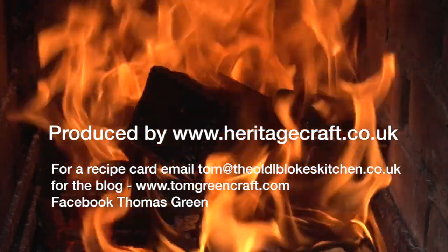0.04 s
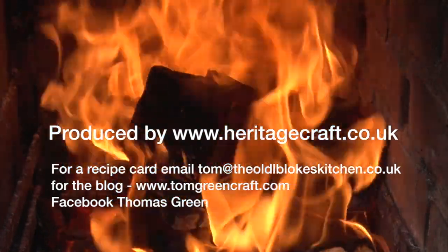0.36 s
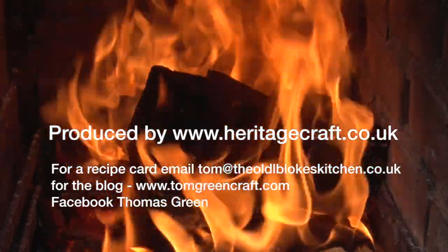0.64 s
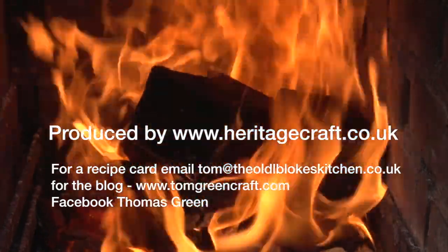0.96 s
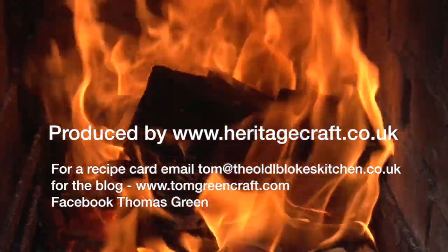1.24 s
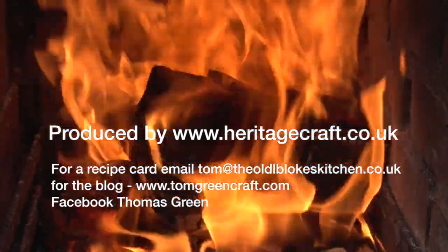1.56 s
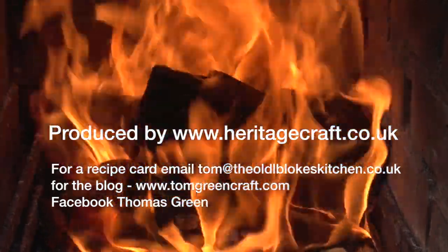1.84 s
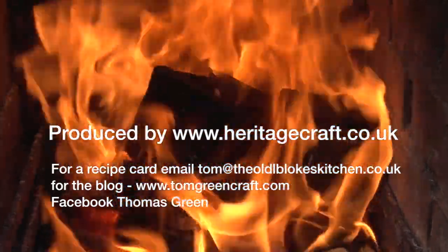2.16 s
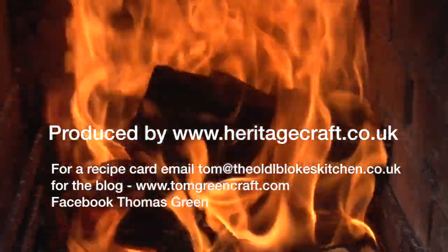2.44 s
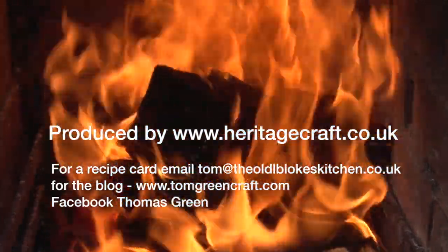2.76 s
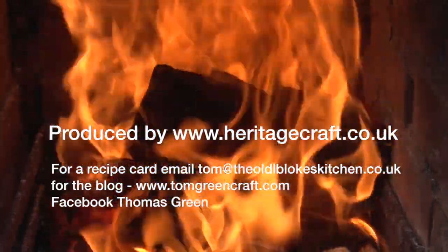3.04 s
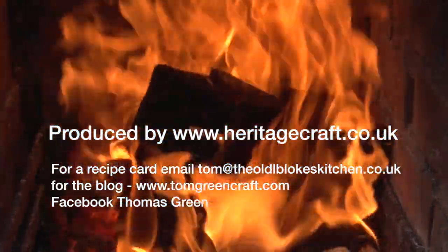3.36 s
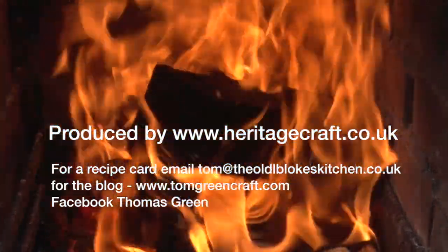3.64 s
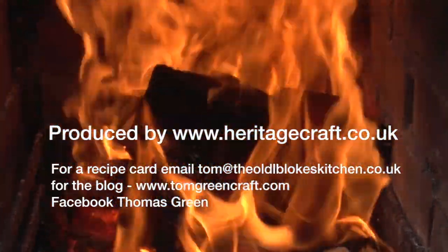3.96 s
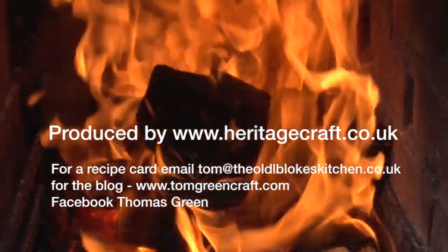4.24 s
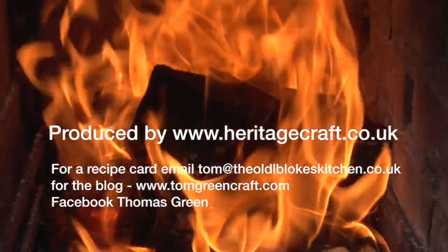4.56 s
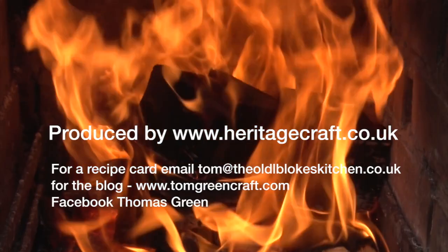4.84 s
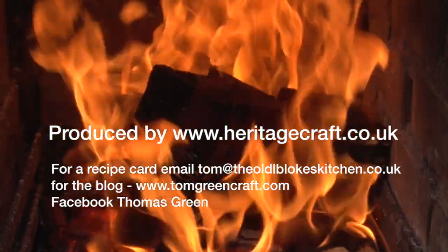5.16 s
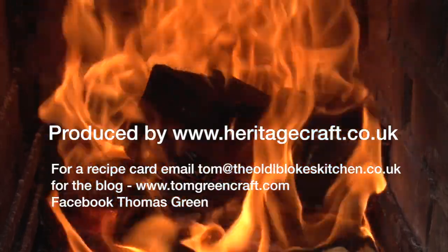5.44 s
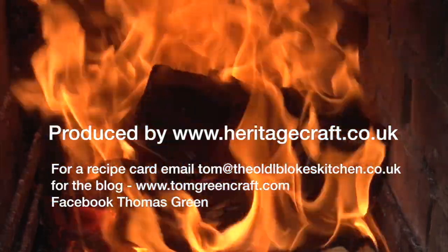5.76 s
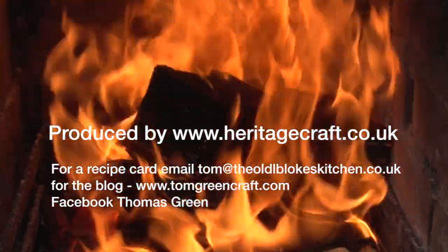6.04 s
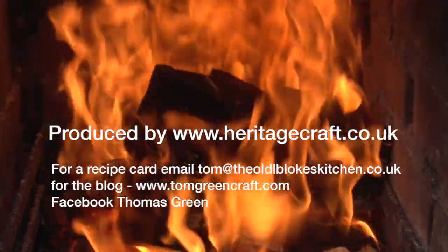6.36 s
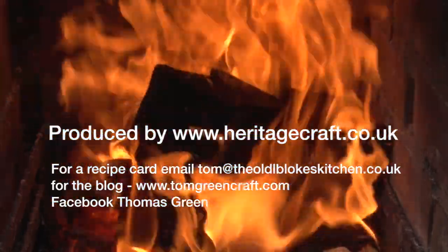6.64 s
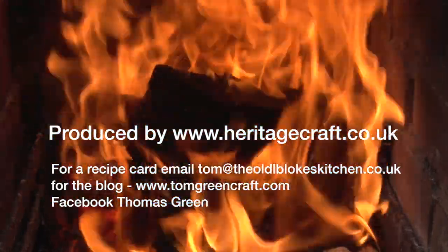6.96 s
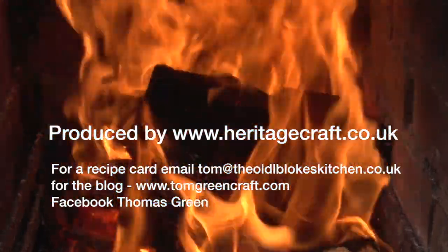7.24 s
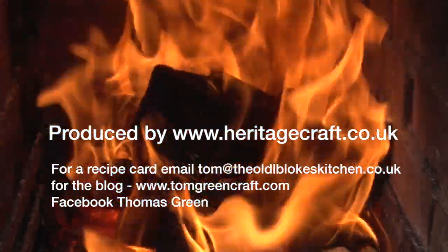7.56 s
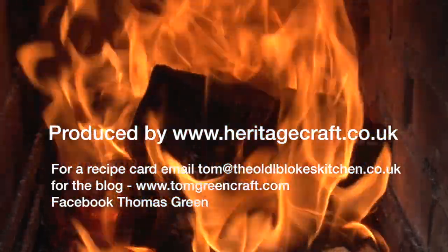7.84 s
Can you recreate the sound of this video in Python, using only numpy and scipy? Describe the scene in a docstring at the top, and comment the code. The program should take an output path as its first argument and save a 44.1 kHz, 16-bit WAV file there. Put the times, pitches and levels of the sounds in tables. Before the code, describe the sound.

A close wood fire puffs and rumbles softly throughout, heard on the left side. Small dry snaps and ticks are scattered over a fine sizzle, with an occasional faint, brief whistle of gas from the logs. After a few sharper pops early on, two very loud cracks stand out, one around halfway and one just before the end, echoing briefly in the firebox and slightly overloading the microphone.

```python
"""A low, fluttering rumble of flames, dotted with ticks and sharp pops: logs burn in an open firebox.
The flames puff and flap, sap sizzles out of the wood, and pockets of steam burst and echo in the box.
Now and then gas escapes through a crack with a faint, short whistle.
The fire is close to a microphone that feeds only the left channel; the two hardest pops overload it."""
import sys
import numpy as np
from scipy import signal
from scipy.fft import rfft, irfft, next_fast_len
from scipy.io import wavfile
from scipy.ndimage import uniform_filter1d

SR = 44100
rng = np.random.default_rng(int(sys.argv[2]) if len(sys.argv) > 2 else 0)


def pcm_store(signal):
    """Save signal as 16-bit PCM."""
    levels = np.round(np.clip(np.atleast_2d(signal), -1, 1) * 32767)
    wavfile.write(sys.argv[1], SR, levels.astype(np.int16).T)


N = 357513
TIME = np.arange(N) / SR
CUTOFF_HZ = 15750  # the highest treble let through

# Steam pockets bursting in the wood; levels are relative, and a higher tilt makes a brighter snap:
# start_s, ring_hz, ring_db, snap_db, tilt_db_per_octave, and if it rings twice: second_hz, second_db
POPS = [(.063, 4010, -55, -55, -2), (0.0883, 7800, -47, -51, 5), (0.1156, 4000, -44.5, -58, 2),
        (0.149, 13900, -51, -56, 4), (.1612, 11900, -35.5, -44, 3.5, 5380, -46),
        (.2366, 11070, -52, -61, 6), (.2461, 11670, -54, -66, 9), (0.2835, 3600, -46, -54, -3),
        (.3219, 2020, -53, -54, -3), (0.3385, 3850, -50, -43.5, 2, 5900, -48), (0.3814, 4900, -49, -51, 4),
        (0.3934, 13820, -41, -56.5, 9, 11800, -47), (.6581, 7400, -49, -60, 6),
        (0.7504, 4970, -41, -47, -2, 2450, -43), (.7817, 6030, -55, -55, 1), (.7926, 13610, -54, -63, 7),
        (0.9945, 5600, -18.5, -26.5, 4.5), (1.1, 3970, -46, -48, -3, 1420, -48),
        (1.2921, 11500, -41, -55, 7), (1.3899, 5170, -54, -59, 5), (1.522, 5450, -42, -54, 5.5),
        (1.7274, 10080, -57, -61, 5), (1.751, 5060, -46, -61, 7), (1.9943, 3700, -54, -55, 0),
        (2.1906, 2340, -31, -39.5, -3, 3530, -39), (2.2117, 5430, -53, -53, 4),
        (2.2246, 5600, -27, -35.5, -2, 3790, -33), (2.2854, 5770, -57, -55, 0),
        (2.3515, 5530, -42, -44.5, 2), (2.563, 3770, -49, -46, -0.5, 5680, -48),
        (2.6754, 7320, -53, -59, 6), (2.8877, 5800, -47, -62, 1), (2.9526, 7130, -31.5, -44, -2.5),
        (3.2254, 5170, -44, -40.5, -1), (3.306, 3620, -46, -57, 2.5), (3.3729, 11280, -52, -60, 7),
        (3.4329, 5500, -48, -51, 1), (3.4437, 11370, -50, -62, 10), (3.5425, 12000, -43, -60, 8),
        (3.5551, 5680, -54, -53, 1), (3.6061, 3270, -55, -55, -1), (3.8919, 11540, -56, -61, 5),
        (4.0003, 5430, -39, -40.5, 3, 6240, -42), (4.0713, 5600, -50, -56, -3), (4.1609, 9950, -53, -58, 4),
        (4.187, 3450, -38.5, -42, 5.5, 4390, -40), (4.3584, 4000, -42.5, -48.5, -1, 2200, -49),
        (4.469, 7460, -49, -51.5, 0), (4.6145, 5310, -4.5, -15.5, -1), (4.7185, 12500, -54, -64, 7),
        (4.8924, 5810, -52, -54, -4), (4.9045, 3790, -48, -54, -0.5), (4.9718, 4220, -43, -45, -2),
        (4.9996, 6160, -54, -54, -1), (5.1419, 13800, -50, -56, 3), (5.2075, 7410, -51, -57, 4),
        (5.2333, 1930, -33.5, -42.5, -4.5, 1335, -41), (5.2712, 7490, -57, -58, 3),
        (5.493, 3270, -52, -54, 0), (5.5117, 5570, -50, -55, -2), (5.5847, 12900, -46, -58, 7),
        (5.7442, 12900, -40, -66, 11), (5.857, 7440, -42, -47.5, -2, 1720, -48),
        (6.1674, 5770, -51, -60, 1), (6.2321, 7140, -32, -44, -2, 3875, -43),
        (6.5059, 5300, -46, -40.5, -1), (6.5868, 3670, -46.5, -57, 3.5), (6.6529, 11240, -53, -60, 7),
        (6.6917, 5600, -55, -56, 3), (6.7126, 5400, -47, -48.5, 2.5), (6.7243, 13650, -54, -57, 6),
        (6.8225, 12100, -44, -56, 7), (6.8352, 5640, -52, -53, 1), (6.8862, 3230, -56, -55, 0),
        (7.1716, 11540, -57, -59, 3), (7.2805, 5300, -39, -40, 3.5, 6675, -43),
        (7.4409, 10080, -54, -59, 4), (7.467, 3450, -40, -39.5, 4, 4435, -41),
        (7.6383, 3930, -41, -50.5, -1, 3445, -47), (7.7487, 7550, -49, -52, 1.5),
        (7.8945, 5290, -5, -14.5, -1)]
# Narrow gaps in the wood that tick: pitch_hz, relative_db
CREVICES = [(2700, -3.5), (3600, 2.5), (4500, -9), (5400, 4.5), (6300, -1), (7400, 0.5), (8600, -8),
            (9900, -7), (11600, 3), (12900, -4), (14400, -1.5)]


def from_db(db):
    """Turn decibels into a number to multiply a sound by."""
    return 10 ** (np.asarray(db) / 20)


def rms_one(x):
    """Scale a signal so that its average strength (rms) is 1."""
    return x / np.sqrt(np.mean(x ** 2) + 1e-20)


def at_level(burst, db):
    """Give a burst as much energy as a steady sound at this level lasting 2 ms."""
    return from_db(db) * burst * np.sqrt(.002 * SR / np.sum(burst ** 2))


def fade(t, fade_s):
    """A dying-away curve that falls by 60 dB in fade_s seconds."""
    return from_db(-60 * t / fade_s)


def drift(rate_hz):
    """A smooth random wander, about 1 in size; a higher rate wanders faster."""
    step, warm_up = 40, 2000
    memory = np.exp(-2 * np.pi * rate_hz * step / SR)
    noise = rng.standard_normal(N // step + warm_up + 2)
    slow = signal.lfilter([1], [1, -2 * memory, memory ** 2], noise)[warm_up:]
    return np.interp(np.arange(N) / step, np.arange(len(slow)), rms_one(slow))


def band(x, low_hz, high_hz):
    """Keep the part of a sound between two frequencies."""
    band_pass = signal.butter(2, [low_hz, min(high_hz, .45 * SR)], "band", fs=SR, output="sos")
    return signal.sosfilt(band_pass, x + 1e-18)


def coloured(x, spectrum):
    """Shape a sound's tone with rows of (frequency_hz, relative_db); the result has strength 1."""
    size = 2 * next_fast_len(N // 2 + SR // 4)
    hz, db = np.transpose(spectrum)
    grid_hz = np.arange(size // 2 + 1) * SR / size
    gain = from_db(np.interp(np.log(grid_hz + 1), np.log(hz), db))
    # Build a minimum-phase filter: it never rings before the sound arrives.
    cepstrum = irfft(np.log(gain))
    cepstrum[1:size // 2] *= 2
    cepstrum[size // 2 + 1:] = 0
    return rms_one(irfft(rfft(x, size) * np.exp(rfft(cepstrum)))[:N])


def peaks_and_dips(x, rows):
    """Boost or weaken one frequency range for each row of (centre_hz, width_hz, boost_db)."""
    for hz, width_hz, db in rows:
        gain = from_db(db / 2)
        width = np.tan(np.pi * width_hz / SR)
        centre = -2 * np.cos(2 * np.pi * hz / SR)
        forward = [1 + width * gain, centre, 1 - width * gain]
        feedback = [1 + width / gain, centre, 1 - width / gain]
        x = signal.lfilter(forward, feedback, x + 1e-18)
    return x


def echoes(x, fade_s, low_hz, high_hz):
    """Closely packed echoes that start after a millisecond and die away."""
    t = np.arange(SR // 2) / SR
    tail = band(rng.standard_normal(len(t)) * fade(t, fade_s) * (t > .001), low_hz, high_hz)
    return signal.fftconvolve(x, tail / np.sqrt(np.sum(tail ** 2)))[:N]


def puffing(rate_hz=4.96, looseness=0.31):
    """Flames swell and tear off in a loose rhythm: a curve about 1 in size."""
    size = 2 * next_fast_len(N // 2 + 1)
    hz = np.arange(size // 2 + 1) * SR / size
    near_rate = np.exp(-((hz / rate_hz - 1) / looseness) ** 2)
    return rms_one(irfft(rfft(rng.standard_normal(N), size) * near_rate)[:N])


def flames(rumble_db=-44.1, rush_db=-55.1, draught_db=-68):
    """Swirling, burning gas makes a deep puffing rumble and a fluttering rush over an even draught."""
    # How strongly the fire burns: time_s, relative_db
    blaze = [(0, 1.5), (.75, 0.5), (1.2, -1), (1.6, -1), (1.9, 1.5), (2.25, -3), (2.68, 3.5), (3.1, 0),
             (3.7, 0.5), (4.15, 2), (4.8, -2.5), (5.4, -2.5), (5.72, -1), (6.2, 0.5), (6.65, 0.5),
             (7.1, 0.5), (7.4, 2), (8.1, -3)]
    # Tongues of flame tearing loose with a soft flap: middle_s, length_s, swell_db
    flaps = [(.68, 0.088, 2), (2.34, 0.14, 4.5), (2.764, 0.063, 2), (2.98, .08, 3), (3.24, .06, 4),
             (3.565, 0.08, 6.5), (3.73, .1, 2.5), (6.028, 0.093, 6), (6.275, .06, 5), (6.52, .06, 2),
             (6.848, 0.1, 5.5)]
    # Tone of the flames rumbling in the box: frequency_hz, relative_db
    rumble_tone = [(10, -40.5), (21, -8), (40, -4), (50, 1), (59, 2), (69, -3), (92, 0), (112, -14),
                   (143, -2), (175, -7), (220, -15), (300, -25.5), (500, -41), (1200, -70)]
    # Tone of the rushing tongues of flame: frequency_hz, relative_db
    rush_tone = [(100, -11.5), (270, 4), (380, -3), (455, -1), (570, -5), (680, -0.5), (950, -4.5),
                 (1400, -11.5), (2100, -17), (3500, -27), (8000, -43)]
    blaze_db = np.interp(TIME, *np.transpose(blaze))
    puff_db = 1.2 * puffing()
    flap_db = sum(db * np.exp(-(2 * (TIME - middle_s) / length_s) ** 2) for middle_s, length_s, db in flaps)
    rumble = coloured(rng.standard_normal(N), rumble_tone)
    rumble /= np.sqrt(uniform_filter1d(rumble ** 2, size=SR // 9))  # even out its chance swells
    rumble *= from_db(rumble_db + blaze_db + puff_db + 0.38 * flap_db)
    fluttering = rng.standard_normal(N) * from_db(2.5 * drift(rate_hz=30))
    rush = from_db(rush_db + .5 * blaze_db + flap_db) * coloured(fluttering, rush_tone)
    draught = from_db(draught_db) * rms_one(band(rng.standard_normal(N), 880, 1830))
    return rumble + rush + draught


def sizzle(hiss_db=-64, ticks_db=-65.2, ticks_per_s=170):
    """Sap boils out as a fine hiss and clumps of tiny ticks; each tick stirs the crevices differently."""
    # Tone of the wood hissing between the box walls: frequency_hz, relative_db
    hiss_tone = [(600, -11), (2000, -7.5), (3600, 0.5), (4600, -6), (5400, 1), (6500, -11), (7400, -0.5),
                 (8600, -17.5), (9550, -4), (10400, -12.5), (11700, -7), (12600, -12.5), (13600, -5),
                 (16000, -15)]
    boiling = from_db(1.06 * drift(rate_hz=1))  # almost even
    tick_at = np.flatnonzero(rng.random(N) < ticks_per_s * from_db(4 * drift(rate_hz=9)) / SR)
    size_db = 5.7 * np.minimum(rng.exponential(1, N), 3.7)[tick_at]
    t = np.arange(SR // 100) / SR
    ticks = np.zeros(N)
    for pitch_hz, db in CREVICES:
        clicks = np.zeros(N)
        clicks[tick_at] = from_db(db + size_db + 5.5 * rng.uniform(-1.5, 1, N)[tick_at])
        spit = band(rng.standard_normal(len(t)) * fade(t, 0.009), pitch_hz - 900, pitch_hz + 900)
        ticks += signal.oaconvolve(clicks, rms_one(spit))[:N]
    hiss = coloured(rng.standard_normal(N), hiss_tone)
    return boiling * (from_db(hiss_db) * hiss + from_db(ticks_db) * rms_one(ticks))


def whistles():
    """Gas jets through narrow cracks: airy noise around one pitch that swells and stops."""
    # Jets of escaping gas: start_s, length_s, pitch_hz, width_hz, level_db
    jets = [(0.384, 0.049, 5400, 190, -56), (0.502, 0.087, 5100, 550, -67), (2.238, 0.069, 5600, 500, -65),
            (2.413, 0.075, 4200, 80, -57.5), (2.677, 0.057, 5430, 500, -63), (2.795, 0.06, 5300, 550, -64),
            (3.54, .15, 3350, 300, -67), (4.013, 0.07, 3520, 60, -61.5), (4.8, 0.012, 5530, 200, -60),
            (4.905, 0.066, 2830, 100, -65), (4.963, .12, 3100, 260, -66), (5.91, .09, 3020, 160, -69),
            (6.077, 0.05, 5400, 350, -64), (6.825, 0.13, 3380, 280, -66), (7.29, 0.075, 3500, 55, -62.5),
            (8.072, 0.016, 5450, 196, -60.5)]
    out = np.zeros(N)
    for start_s, length_s, pitch_hz, width_hz, level_db in jets:
        blowing = (TIME > start_s) & (TIME < start_s + length_s)
        air = band(rng.standard_normal(SR // 2), pitch_hz - width_hz / 2, pitch_hz + width_hz / 2)
        swell = np.sqrt(np.abs(np.sin(np.pi * (TIME[blowing] - start_s) / length_s)))
        out[blowing] += from_db(level_db) * swell * rms_one(air[-blowing.sum():])
    return out


def firebox(snaps, rings):
    """The hollow box echoes each pop; its walls ring faintly, one plate on a note of its own."""
    box = from_db(-18) * echoes(snaps + 0.43 * rings, fade_s=0.047, low_hz=1220, high_hz=12000)
    hollow = from_db(-19) * echoes(snaps, fade_s=0.012, low_hz=280, high_hz=1360)
    walls = from_db(-32) * echoes(snaps, fade_s=0.26, low_hz=2700, high_hz=7300)
    plate = from_db(-41) * echoes(snaps, fade_s=0.31, low_hz=3010, high_hz=3400)
    return box + hollow + walls + plate


def faint_pops(pops_per_s=2.5, ring_db=-58, snap_db=-63, count=70):
    """Small pockets burst at random, each ringing in one of the crevices; returns rows like POPS."""
    starts = np.cumsum(rng.exponential(1, count)) / pops_per_s
    pitches = rng.choice([hz for hz, _ in CREVICES], count)
    chance = rng.standard_normal((count, 2))
    return [(start_s, hz, ring_db + 3 * size, snap_db + 3 * size, 2 + 2.5 * brightness)
            for start_s, hz, (size, brightness) in zip(starts, pitches, chance) if start_s < N / SR]


def splinters(base_db=-15, scatter_s=.004, spread_db=4, count=10):
    """Small dry fibres snap just after each burst in POPS, harder after the strong ones."""
    clicks = np.zeros(N)
    for start_s, _, _, snap_db, *_ in POPS:
        delay, size = rng.standard_normal((2, count))
        at = np.clip((start_s + scatter_s * np.abs(delay)) * SR, 0, N - 1).astype(int)
        clicks[at] += from_db(base_db + 0.46 * snap_db + spread_db * size) * rng.choice([-1, 1], count)
    return band(clicks, 1700, 7700)


def pops(bursts, tear_fade_s=0.0082, ring_fade_s=.005, second_fade_s=.008, tilt_centre_hz=4000):
    """A steam pocket bursts with a snap, fibres tear, and the split rings briefly on one or two notes."""
    # The thud, knock, crack and fizz in every snap: low_hz, high_hz, relative_db
    snap_parts = [(263, 1490, -6.5), (2060, 3830, -0.5), (4450, 7100, 0.5), (9700, 15000, -1)]
    # Echoes between log and box walls colour every snap alike: centre_hz, width_hz, boost_db
    snap_colour = [(190, 220, -4), (1000, 600, 5.5), (2040, 200, -2.5), (2610, 320, 3), (2830, 220, -6),
                   (3150, 280, 3), (4000, 400, 2), (4630, 500, -3), (6400, 400, -6), (7550, 610, 6),
                   (8390, 400, -2.5), (10500, 500, -5.5), (11440, 600, 3), (14400, 400, -2)]
    snaps, rings = np.zeros((2, N + SR))
    t = np.arange(SR // 60) / SR
    for start_s, ring_hz, ring_db, snap_db, tilt_db, *second_ring in bursts:
        span = slice(round(start_s * SR), round(start_s * SR) + len(t))
        fibres = band(rng.standard_normal(len(t)) * fade(t, tear_fade_s), 3800, CUTOFF_HZ)
        click = t == 0
        snap = click + fibres / (1 + from_db(snap_db + 24))  # the hardest bursts break cleanest
        for k, (low_hz, high_hz, db) in enumerate(snap_parts):
            octaves = np.log2(np.sqrt(low_hz * high_hz) / tilt_centre_hz)
            part = at_level(band(snap, low_hz, high_hz), snap_db + db + tilt_db * octaves)
            snaps[span] -= (-1) ** k * part  # flipping every other part lets them join smoothly
        notes = [(ring_hz, ring_db, ring_fade_s)]
        if second_ring:
            notes.append((*second_ring, second_fade_s))
        for hz, db, fade_s in notes:
            rings[span] += at_level(np.sin(2 * np.pi * hz * t) * fade(t, fade_s), db)
    bass_cut = signal.butter(1, 300, "high", fs=SR, output="sos")  # the ringing notes carry no bass
    rings = signal.sosfilt(bass_cut, rings[:N] + 1e-18)
    snaps = peaks_and_dips(snaps[:N], snap_colour)
    return from_db(-1.5) * snaps, from_db(-2) * rings


def scene(leak_db=-80, faint_hiss_db=-83):
    """The fire is on the left; the right has only a very faint, even hiss and a tiny leak of the fire."""
    snaps, rings = pops(POPS + faint_pops())
    snaps += splinters()
    fire = firebox(snaps, rings) + flames() + sizzle() + whistles() + snaps + rings
    right = from_db(leak_db) * fire + from_db(faint_hiss_db) * rng.standard_normal(N)
    return np.array([fire, right])


def record(dry, limit=.85):
    """The hardest pops overload the input, which rounds off their peaks; the highest treble is cut."""
    excess = dry - np.clip(dry, -limit, limit)
    smoothing = signal.butter(4, 14000, fs=SR, output="sos")
    rounded = dry - signal.sosfiltfilt(smoothing, excess + 1e-18)
    treble_cut = signal.ellip(10, .1, 80, CUTOFF_HZ, fs=SR, output="sos")
    return signal.sosfilt(treble_cut, rounded)


dry = scene()
out = record(dry)
pcm_store(out)
```